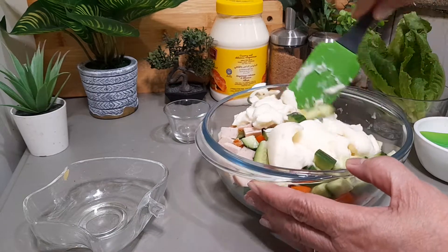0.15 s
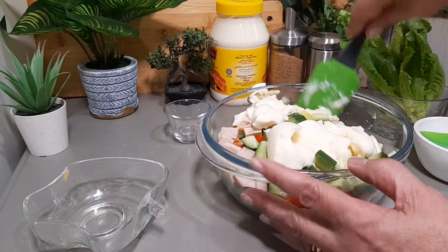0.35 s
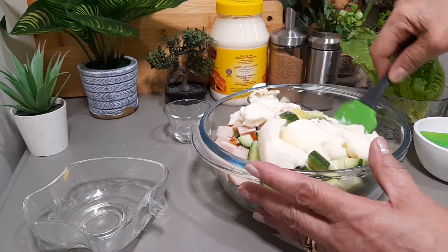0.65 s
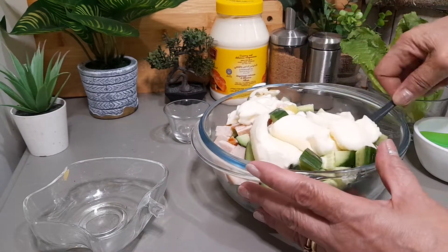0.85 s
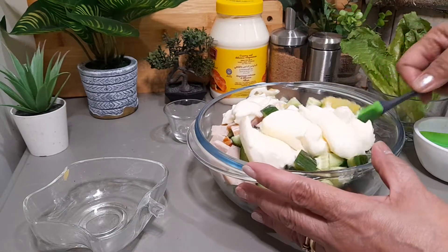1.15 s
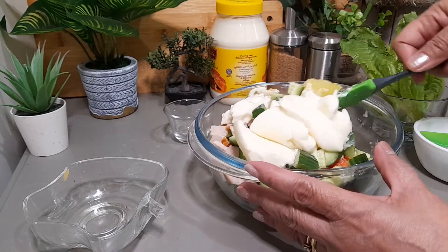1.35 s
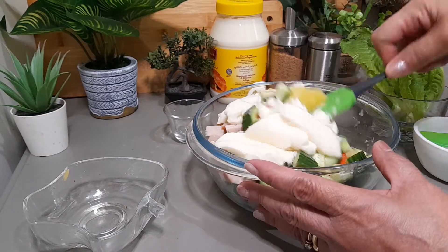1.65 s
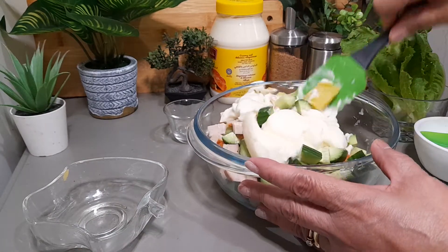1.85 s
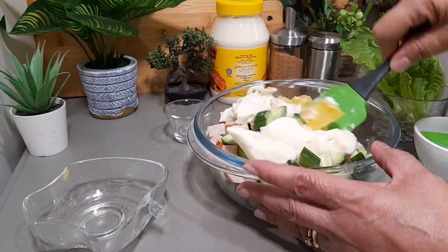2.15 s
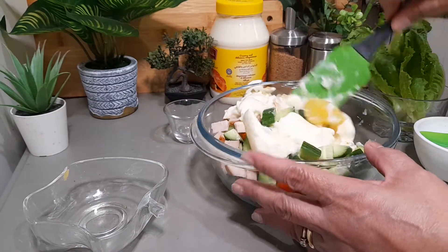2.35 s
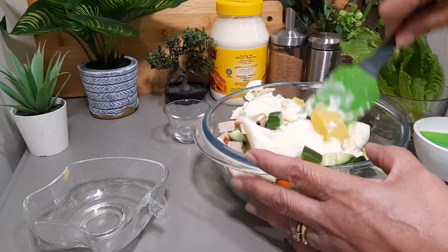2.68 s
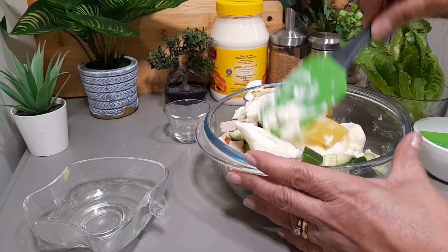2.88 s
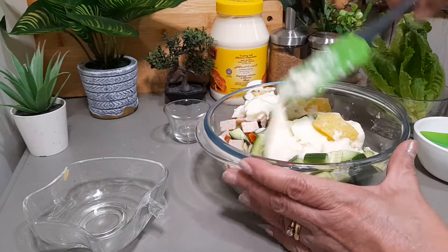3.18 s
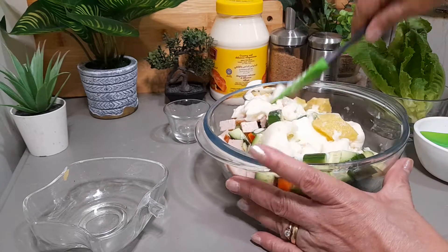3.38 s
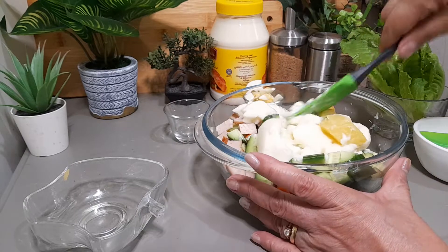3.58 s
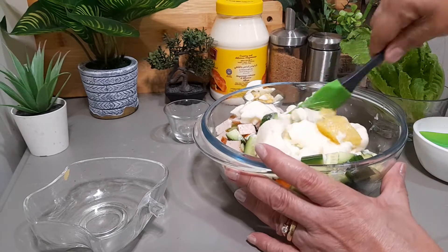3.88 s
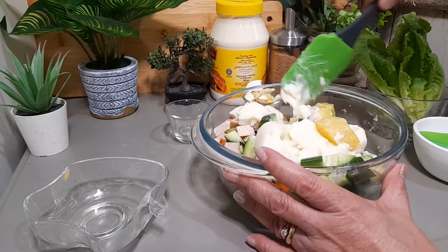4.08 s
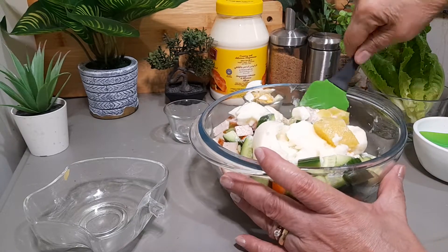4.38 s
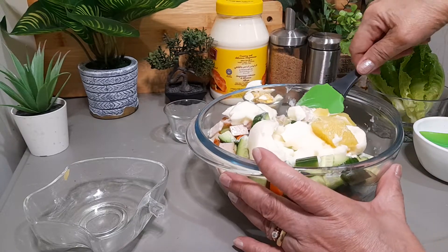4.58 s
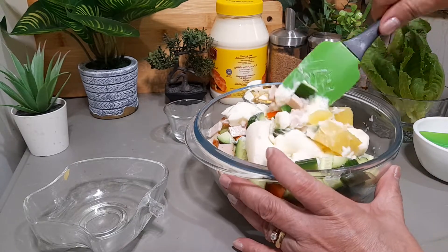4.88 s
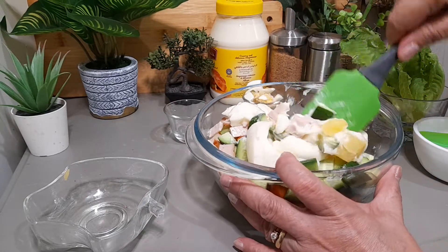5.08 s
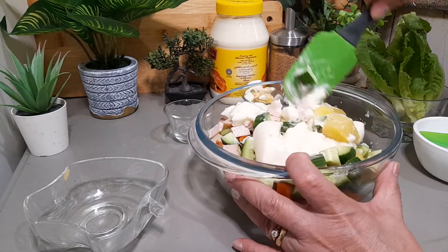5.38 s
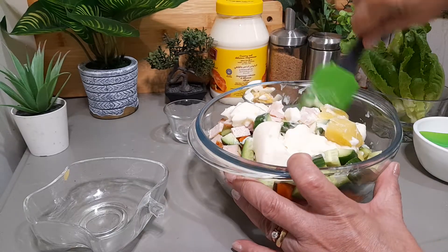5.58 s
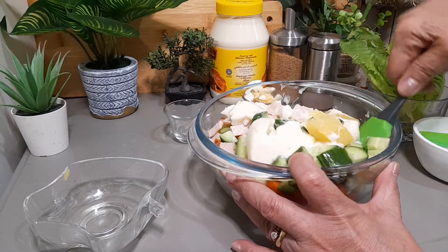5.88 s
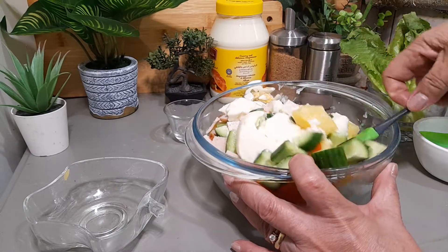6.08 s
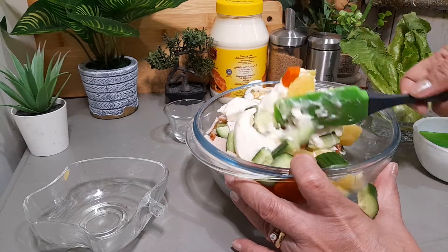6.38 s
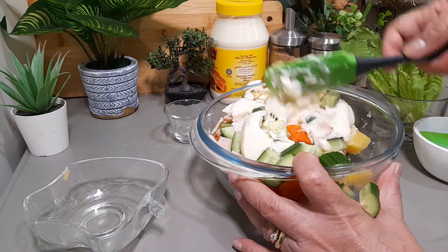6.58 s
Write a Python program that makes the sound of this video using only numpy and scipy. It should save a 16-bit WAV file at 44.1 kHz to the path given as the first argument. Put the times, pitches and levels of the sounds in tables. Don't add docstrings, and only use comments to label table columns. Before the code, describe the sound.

Soft wet squishing and fine crackles of thick dressing being folded in a glass bowl, with ringing clinks, counter knocks and a steady low hum.

```python
import sys
import numpy as np
from scipy import signal
from scipy.fft import rfft, irfft, next_fast_len
from scipy.io import wavfile

SR = 44100
rng = np.random.default_rng(int(sys.argv[2]) if len(sys.argv) > 2 else 0)


def inscribe(sig):
    pcm = np.round(np.clip(np.atleast_2d(sig).T, -1, 1) * 32767)
    wavfile.write(sys.argv[1], SR, pcm.astype(np.int16))


def invert_db(level):
    return 10 ** (np.asarray(level, dtype=float) / 20)


N = 297234

# frequency [Hz], left-right likeness [-1 to 1].
STEREO_LIKENESS = [(60, 0.69), (180, 1), (550, 0.67), (1650, -0.24), (4970, -0.16), (15000, -0.27)]
# frequency [Hz], left over right [dB].
STEREO_LEANING = [(60, 3), (180, -0.5), (550, -3.5), (1650, 4), (4970, 0), (15000, 0)]


def rms_one(x):
    return x / np.sqrt(np.mean(x ** 2) + 1e-20)


def at_hz(points, hz):
    table_hz, values = np.transpose(points)
    return np.interp(np.log(hz + 1e-9), np.log(table_hz), values)


def sides(pan_db):
    return invert_db(np.array([[0.5], [-0.5]]) * pan_db)


def spread(mid, side, alike):
    alike = np.clip(alike, -0.99, 0.99)
    return np.sqrt(1 + alike) * mid + np.sqrt(1 - alike) * side * [[1], [-1]]


def band(x, low_hz, high_hz, order=2):
    edges_hz = [low_hz, min(high_hz, 0.45 * SR)]
    return signal.sosfilt(signal.butter(order, edges_hz, "band", fs=SR, output="sos"), x)


def fall(t60, size):
    return invert_db(-60 * np.arange(size) / SR / t60)


def ringing(hz, t60, size):
    turning = np.exp(2j * np.pi * hz[:, None] * np.arange(size) / SR)
    return fall(t60[:, None], size) * turning


def add(out, s, sound):
    at = int(s * SR)
    out[:, at:at + sound.shape[-1]] += sound[..., :N - at]


def room_tone():
    # frequency in Hz, level in dB per Hz.
    rumble_and_air = [(20, -100), (35, -77), (55, -78.5), (130, -69), (165, -77.5), (260, -74), (350, -77),
                      (430, -83.5), (800, -90), (1150, -102), (2300, -108), (3500, -116), (8000, -120),
                      (14000, -116)]
    # frequency in Hz, width in Hz, level in dB.
    compressor_orders = [(99, 18, -50), (125.6, 25, -55), (195.7, 11, -54), (298.7, 21, -47),
                         (59, 10, -59.5), (741, 12, -70)]
    size = next_fast_len(N)
    hz = np.fft.rfftfreq(size, 1 / SR)
    power = invert_db(2 * at_hz(rumble_and_air, hz))
    for line_hz, width_hz, level_db in compressor_orders:
        resonance = 1 / (1 + (2 * (hz - line_hz) / width_hz) ** 2) ** 2
        power += invert_db(2 * level_db) * 4 / (np.pi * width_hz) * resonance
    mid, side = rfft(rng.standard_normal((2, size))) * np.sqrt(power * SR / 2)
    pair = sides(at_hz(STEREO_LEANING, hz)) * spread(mid, side, at_hz(STEREO_LIKENESS, hz))
    return irfft(pair, size)[:, :N] / np.sqrt(2)


def mains():
    # frequency in Hz, level in dB.
    magnet_line = (100, -42)
    hz, level_db = magnet_line
    sine = np.sin(2 * np.pi * hz * np.arange(N) / SR)
    return sides(at_hz(STEREO_LEANING, hz)) * invert_db(level_db) * np.sqrt(2) * sine


def kitchen(x):
    # low edge in Hz, high edge in Hz, t60 in seconds, level in dB.
    echo_bands = [(151, 410, 0.32, 0), (378, 857, 0.33, 2.5), (1100, 3450, 0.34, -0.5),
                  (2650, 5630, 0.3, -1.5), (6130, 28000, 0.39, -4)]
    size, tail = 22000, 0
    white = rng.standard_normal((2, size))
    for low_hz, high_hz, t60, level_db in echo_bands:
        alike = at_hz(STEREO_LIKENESS, np.sqrt(low_hz * high_hz))
        diffuse = spread(*band(white, low_hz, high_hz), alike)
        tail = tail + invert_db(level_db) * diffuse * fall(t60, size) / np.sqrt(t60 * SR / 14)
    build_up = 1 - fall(0.06, size)
    return signal.oaconvolve(x, tail * build_up, axes=1)[:, :N]


def crackle(level_db, low_hz, high_hz, per_s, uneven_db, alike):
    heights_db = uneven_db * np.minimum(rng.exponential(1, (2, N)), 5)
    heights = invert_db(heights_db) * rng.choice([-1, 1], (2, N))
    mid, side = heights * (rng.random((2, N)) < per_s / SR)
    return invert_db(level_db) * rms_one(band(spread(mid, side, alike), low_hz, high_hz))


def cream():
    # peak in seconds, crackle in dB, seconds to fade 10 dB, coarse grains over fine in dB. The rows
    # at 0.15 s and 1.78 s are the rough tails of glass clinks.
    partings = [(0.07, -64.5, 0.03, -5), (0.15, -72.5, 0.32, 7.5), (0.54, -65, 0.33, -10),
                (0.67, -55.5, 0.08, -2.5), (0.94, -64, 0.03, -3), (1.2, -66.5, 0.5, -8),
                (1.45, -69, 0, -12), (1.69, -61, 0.04, -19), (1.78, -58, 0.04, 6), (2.12, -71, 0.7, -0.5),
                (2.36, -57, 0.06, -5.5), (2.42, -70, 0.35, 4), (2.78, -71, 0.37, 3.5),
                (3.11, -66, 0.33, -2), (3.28, -64, 0.12, -20), (3.49, -66, 0.1, -7),
                (3.85, -65.5, 0.16, -10.5), (4.02, -67.5, 0.35, -5.5), (4.3, -63.5, 0.04, -4.5),
                (4.38, -66.5, 0.1, -2), (4.54, -61.5, .08, -7.5), (4.69, -64, 0.09, -5),
                (4.88, -69, 0.43, -1.5), (5.222, -63.5, 0.1, -3.5), (5.63, -66, 0.28, -3),
                (5.78, -58, 0.19, -5), (5.97, -68.5, 0.66, -3), (6.36, -63, 0.26, -11),
                (6.74, -65.5, 0, -3.5)]
    # fine, middle and coarse grains in dB.
    settling_db = (-79.5, -83, -77)
    t = np.arange(0, N + 64, 64) / SR
    peak_s, level_db, fade_s, coarse_db = np.transpose(partings)[:, :, None]
    rise_share = 0.35
    swell_db = level_db - 10 * np.maximum(t - peak_s, (peak_s - t) / rise_share) / fade_s
    lifts_db = (0, -5.5 + 0.6 * coarse_db, coarse_db)
    courses_db = []
    for rest_db, lift_db in zip(settling_db, lifts_db):
        power = invert_db(2 * rest_db) + invert_db(2 * (swell_db + lift_db)).sum(axis=0)
        courses_db.append(np.interp(np.arange(N) / SR, t, 10 * np.log10(power)))
    fine_db, squish_db, drag_db = courses_db
    fine = crackle(fine_db + 0.5, 8240, 25500, per_s=6000, uneven_db=3.3, alike=0.053) * sides(1.4)
    squish = crackle(squish_db, 4250, 6030, per_s=4000, uneven_db=4.1, alike=0.075)
    drag = crackle(drag_db + 0.5, 850, 2710, per_s=3000, uneven_db=1.7, alike=0.15)
    return fine + squish + drag


def puffs(table, t60, width):
    out = np.zeros((2, N))
    for s, level_db, hz, pan_db in table:
        puff = spread(*rng.standard_normal((2, 1200)), 0.2) * fall(t60, size=1200)
        add(out, s, invert_db(level_db) * sides(pan_db) * band(puff, hz / width ** 1.6, hz * width))
    return out


def dressing():
    # start in seconds, peak in dB, centre in Hz, left over right in dB.
    films = [(0.9273, -63, 5200, 0), (0.712, -54, 5000, 1.5), (0.755, -55, 5800, 5),
             (1.047, -58, 8000, 1.5), (2.0503, -54, 6520, 1.5), (2.123, -56, 7000, 7),
             (2.352, -32.5, 9900, 1), (1.1109, -46, 8750, 2), (1.2236, -46.5, 8600, 3.5),
             (1.4336, -55, 5630, 1.5), (1.7514, -41, 10200, 5), (2.154, -50, 6470, 1),
             (0.0588, -56, 9980, 7), (2.3501, -33, 4500, 1), (2.4843, -46.5, 8700, -16),
             (2.6115, -57, 8300, -4), (2.6569, -34, 5700, 1), (2.7117, -42, 6100, .5),
             (2.9507, -54.5, 11500, -5.5), (2.9761, -48, 6400, -3.5), (3.4785, -51.5, 9500, -7),
             (3.9075, -44, 5460, 3), (4.0043, -41.5, 5200, 3), (4.0043, -47, 10700, 2),
             (4.341, -48, 10400, 0), (4.6728, -50, 10600, 2), (4.8703, -46, 5240, 3), (5.018, -49, 5630, 3),
             (5.3413, -46.5, 10500, 2), (5.3887, -48, 8140, -10), (5.6271, -49, 7100, -1),
             (5.7214, -46.5, 10700, 1), (5.7833, -31, 5700, 7), (6.1504, -56, 5700, 7),
             (6.1913, -52, 8500, .5), (6.2687, -57, 9360, -3)]
    # start in seconds, peak in dB, centre in Hz.
    threads = [(0.5302, -48.5, 13100), (0.5452, -50.5, 12700), (0.631, -51, 12000), (0.6629, -50, 13730),
               (0.8001, -50, 11300), (0.9273, -50.5, 14150), (0.9435, -45.5, 12800), (0.991, -46.5, 14000),
               (1.1907, -52, 11200), (1.4501, -47.5, 13100), (1.6876, -51.5, 13800), (2.0503, -48.5, 11660),
               (2.123, -45, 13430), (2.7766, -53, 13900), (3.1075, -37, 11200), (3.5179, -51, 12740),
               (3.8457, -47, 11200), (4.2955, -48.5, 13100), (4.4633, -46, 11900), (4.527, -41.5, 11200),
               (4.694, -43.5, 11900), (4.8714, -40, 12000), (5.2192, -43, 11300), (5.628, -46.5, 14000),
               (5.6895, -51, 14100), (5.7468, -53, 13170), (5.7827, -37, 13500), (6.323, -52, 11800),
               (6.3445, -45, 13950), (6.6029, -52.5, 14800)]
    # start in seconds, peak in dB, centre in Hz, left over right in dB. The rows at 1.676 s and #
    # 1.677 s are one more film smack, high up near 7 kHz, that rings like the pockets.
    air_pockets = [(0.6624, -59, 2570, 4), (2.0887, -61, 3000, 1.5), (0.5303, -61, 4600, -5),
                   (2.518, -51, 4950, -0.5), (5.912, -54, 4900, 1.5), (2.2394, -55, 2250, 5),
                   (2.5102, -46, 2620, 3), (2.6115, -51, 2500, 0.0), (2.6569, -40.5, 2360, 4),
                   (3.011, -59.5, 5200, -4), (6.445, -52, 4320, 0.0), (3.6336, -51, 2120, 5.5),
                   (3.907, -50, 4900, -3), (4.6753, -53, 2920, 7), (4.8606, -53.5, 2900, 6),
                   (5.207, -49, 2770, 2), (5.251, -40.5, 2270, 0.5), (5.5044, -62.5, 2760, 2),
                   (5.6196, -53, 1990, -2), (6.1, -61, 5300, -4), (1.676, -59, 7500, 2),
                   (1.677, -61, 6000, 1.5), (3.905, -49, 1150, 1.5), (4.004, -46.5, 951, 1.5),
                   (6.189, -50, 1300, 1.5), (0.917, -44, 1620, 1.5), (5.785, -42, 1660, 3),
                   (5.785, -40, 2400, 3), (5.785, -40, 880, 1.5), (1.618, -55, 800, 1.5),
                   (5.021, -50, 1900, 1.5)]
    panned_threads = [(*thread, 1) for thread in threads]
    smacks = puffs(films + panned_threads, t60=0.012, width=1.188)
    return smacks + invert_db(8.0) * puffs(air_pockets, t60=0.025, width=1.08)


def knocks():
    # start in seconds, level near 1 kHz in dB, boom near 290 Hz in dB,
    # edge near 2.6 kHz in dB, ring of the counter in dB.
    dull_knocks = [(0.1, -23.5, -6.5, -10, -0.8), (0.622, -44, -21, -9, -1), (0.896, -41, 6.5, -13, -.4),
                   (0.916, -38, 5, -9, -.4), (1.62, -58.5, 8, -24, 7), (1.752, -29, -7.5, -15, -1),
                   (2.163, -41, 7.5, -14, 0), (2.282, -20.5, -14, -9, -2), (2.35, -22, -7, -8.5, -0.2),
                   (2.399, -35, -8, -8, -1), (2.506, -51, -20.5, 0.5, 3), (2.658, -59.5, 14.5, 9.5, 1.5),
                   (2.713, -30, -0.5, -11.5, -0.5), (3.057, -30.5, -6.5, -17.5, -1.5),
                   (3.904, -48, -18, -12, -3), (4.005, -48, -14, -14, -4), (4.68, -69, 16.5, 2.5, -.4),
                   (4.86, -69, 12, -2, -1), (5.021, -40.5, 9, -11, 0.5), (5.201, -69.5, 22, -4, -3),
                   (5.252, -55, 7, 0.5, -4), (5.271, -50, -13, -4, 1), (5.631, -48.5, 11, -16, 1.7),
                   (5.782, -33.5, 4.5, -5, 0), (5.847, -44, 11.5, -9, -1), (5.944, -60, 10.5, -2, -10),
                   (6.19, -49, 9.5, -20, -2.5), (6.247, -64.5, 23, -9, -2), (6.36, -66, 26.5, -9, -.4),
                   (6.446, -68.5, 29, -2, 3.7), (1.149, -67.5, 27, -10, 3.5), (2.197, -63, 21.5, -9, 1),
                   (1.003, -53, -8, -4, 2), (6.04, -54, -3.5, -12, -5)]
    colour_hz = [290, 470, 1000, 2600, 7500]
    # frequency in Hz, level in dB, t60 in seconds.
    counter_modes = [(261.2, -1, 0.22), (302.1, 5.5, 0.19), (372.4, -3, 0.27), (469, -9, 0.5),
                     (532, -11.5, 0.11), (632, -9.5, 0.19), (724, -5, 0.088), (869, -5, 0.091),
                     (978, -4.5, .11), (1200, -19.5, 0.26), (1470, -14.5, 0.068)]
    # level in dB, frequency in Hz, t60 in seconds.
    flexing = (-39.5, 58, 0.96)
    crack_db, body_db = -6.5, -3
    hz, level_db, t60 = np.transpose(counter_modes)
    size, lead_in, out = 16384, 256, np.zeros((2, N))
    soft_start = 1 - fall(0.019, size)
    fade_out = np.hanning(2 * size)[size:]
    modes = ringing(hz, t60, size).imag * soft_start * fade_out
    bins = np.fft.rfftfreq(size, 1 / SR)
    for s, peak_db, boom_db, edge_db, ring_db in dull_knocks:
        low_body_db = -6.5 + 0.02 * boom_db
        top_db = edge_db - 17.5
        colour_db = [boom_db - 23, boom_db, low_body_db, -4, edge_db, top_db, top_db - 9]
        colour = np.transpose([[120, *colour_hz, 16000], colour_db])
        density = invert_db(at_hz(colour, bins)) * np.sqrt(SR / (bins + 50))
        puff = spread(*rng.standard_normal((2, size)), 0.377) * fall(0.099, size)
        crack = irfft(rfft(np.roll(puff, lead_in, axis=1)) * density, size)[:, lead_in:]
        sign, uneven, lean = rng.standard_normal((3, len(hz)))
        strength_db = at_hz(colour, hz) + level_db + 2.5 * uneven + lean * [[1.5], [-1.5]]
        strength = np.sign(sign) * invert_db(strength_db)
        add(out, s, invert_db(peak_db + crack_db) * crack)
        add(out, s, invert_db(peak_db + body_db + ring_db) * strength @ modes)
    thump_db, thump_hz, thump_t60 = flexing
    thump = ringing(np.array([thump_hz]), np.array([thump_t60]), size=24000).imag
    add(out, 2.35, invert_db(thump_db) * thump)
    return out


def bowl_modes():
    # frequency in Hz, level in dB, t60 in seconds, left over right in dB, left phase lead in rad.
    families = [
        [(1706, -4, 0.45, 10.5, 1.4)],
        [(1916, -2, 0.33, 2.5, -1.2), (1993, -10, 0.1, 6, -1.6), (2500, -13.5, 0.12, 0.5, 1.8)],
        [(3183, -6.5, 0.29, 4, 2), (3241, 0, 0.3, 4.5, -2.5)],
        [(4420, -1, 0.3, 0, 2.4), (4480, 0, 0.25, -3.5, 0.91)],
        [(4916, -0.5, 0.2, 0.5, 1.66), (6720, -11, 0.25, 0.5, 2), (8974, -25, 0.13, -1.5, 1.5),
         (10040, -14, 0.2, 3.5, 0.5), (10490, -17, 0.1, 3.5, 0.53), (11300, -16.5, 0.15, 4, -1.3)],
    ]
    loaded_wall = [(1443, 4.5, .16, 3.5, .6), (1800, 2, .12, 2, -.6), (2218, 2.5, .12, 3.5, 1.2),
                   (2760, -4.5, .12, 2, -1.8), (3840, -7.5, .1, 1.5, 1.9), (4140, -5.5, 0.14, 1.5, -.8),
                   (4721, -2.5, .12, 2.5, 1.2), (5530, -9, .1, 0.5, -1.2), (5932, -9.5, .12, 2.5, .8),
                   (7736, -16.5, .15, 2.5, .6), (8400, -17.5, 0.098, 1.5, -.6),
                   (12410, -17.5, .12, 2.5, .6), (13260, -20.5, .12, 3, -.6), (14800, -22, .12, 4.5, .6)]
    bowl = families + [loaded_wall]
    family = np.repeat(np.arange(len(bowl)), [len(rows) for rows in bowl])
    hz, level_db, t60, pan_db, lead = np.concatenate(bowl).T
    size = 24000
    modes = ringing(hz, t60, size) * (1 - fall(0.00077, size))
    modes = modes * (1 + invert_db(-13.5) * np.exp(2j * np.pi * 0.005 * hz[:, None] * np.arange(size) / SR))
    modes = modes * (1 + invert_db(1) * fall(0.09, size)) * invert_db(-3.5)
    radiated = sides(pan_db) * np.exp(0.5j * lead * [[1], [-1]])
    return family, level_db, modes, radiated


def rubs(family, level_db, modes, radiated):
    # start in seconds, end in seconds, level in dB, low pair in dB.
    strokes = [
        (0.632, 0.843, -68, -8),
        (0.93, 1.0, -78, 4),
        (3.257, 3.32, -78.5, 0),
        (5.855, 6.098, -74.5, 6),
    ]
    family_db = [-13, -11, -4, -20, -5, -15]
    out = np.zeros((2, N))
    for start, end, rub_db, pair_db in strokes:
        drive_db = np.array(family_db)[family] + level_db + pair_db * (family == 1)
        answer = (radiated * invert_db(drive_db) @ modes).imag * fall(0.19, size=24000)
        size = int((end - start) * SR)
        slips = rng.standard_normal((1, size)) * (rng.random(size) < 600 / SR)
        slips = slips * invert_db(-6.5 * np.arange(size) / size)
        add(out, start, invert_db(rub_db) * signal.fftconvolve(slips, answer, axes=1))
    return out


def clinks(family, level_db, modes, radiated):
    # start in seconds, level in dB, upper mode of the low pair over the lower in dB,
    # hardness in dB per octave, damping by the blade as t60 in seconds.
    strikes = [(0.1009, -30, -2, -3, 2.6), (0.6238, -53.5, -13, 6, 0.38), (0.6905, -66, -17, -1, .3),
               (0.747, -59, -15, -6, 0.47), (0.9168, -46.5, 2, -8, 0.087), (1.0025, -55, -8, -0.5, 0.11),
               (1.7521, -38.5, 5, 2.5, 0.69), (2.2837, -27, 1.5, 6.5, 1), (2.35, -41, 6, 4, 0.24),
               (2.3983, -39.5, -4, -1, 0.44), (5.784, -44, -16, 2, 0.084), (5.8464, -57.5, 5, -2, 0.2),
               (5.9077, -68.5, 6, 13, .2), (5.9447, -69, 7.5, 3, .25), (6.0293, -78, 10, 9, 0.25),
               (2.2972, -32, 2.5, 4, .6), (0.112, -39, -3, -1.5, .9), (1.765, -44, 4.5, 3.5, .5)]
    rim_pair_db = [0.5, -12, -9, -9, -3, -11, 3, -5, -3.5, -2.5, -5, -6, -15, -12, -12, -3, -2.5, -8]
    family_level_db = [-0.5, -0.5, -15.5, -17.5, -12.5, -25]
    family_hz = [1700, 1700, 3200, 4500, 4900, 3200]
    octaves = np.log2(np.array(family_hz) / family_hz[0])
    out, count = np.zeros((2, N)), len(level_db)
    for (s, clink_db, pair_db, hardness_db, damping_t60), rim_db in zip(strikes, rim_pair_db):
        family_db = clink_db + np.array(family_level_db) + hardness_db * octaves
        family_db[1] += pair_db
        family_db[3] += rim_db
        spot = np.exp(2j * np.pi * rng.random(count)) * invert_db(2.1 * rng.standard_normal(count))
        strength = radiated * spot * invert_db(family_db[family] + level_db + 5.5)
        add(out, s, (strength @ modes).imag * fall(damping_t60, size=24000))
    return out


def gripped(bowl):
    split_hz, depth, speed_hz = 2800, 0.28, 70
    low = signal.sosfilt(signal.butter(4, split_hz, fs=SR, output="sos"), bowl)
    high = signal.sosfilt(signal.butter(4, split_hz, "high", fs=SR, output="sos"), bowl)
    slow = rms_one(band(rng.standard_normal(N), 8, speed_hz))
    fast = rms_one(band(rng.standard_normal(N), 8, 2 * speed_hz))
    return low * (1 + 0.6 * depth * slow) + high * (1 + depth * fast)


def scene():
    background = room_tone() + mains()
    near = knocks() + dressing()
    glass = bowl_modes()
    bowl = clinks(*glass) + rubs(*glass)
    echoes = kitchen(near + invert_db(-3.5) * bowl)
    return background + near + echoes + cream() + gripped(bowl)


def band_limit(x):
    return signal.sosfilt(signal.butter(12, 15970, fs=SR, output="sos"), x)


def record(dry):
    bass_cut = signal.sosfilt(signal.butter(3, 40, "high", fs=SR, output="sos"), dry)
    top_cut = signal.sosfilt(signal.cheby2(16, 60, 16120, fs=SR, output="sos"), bass_cut)
    return band_limit(top_cut)


dry = scene()
out = record(dry)
inscribe(out)
```